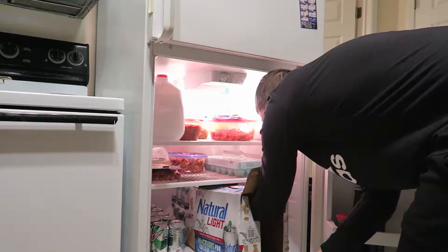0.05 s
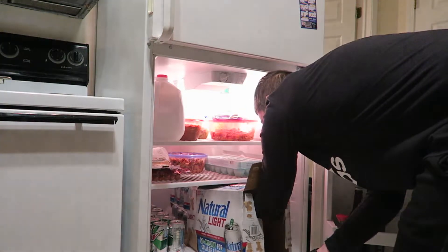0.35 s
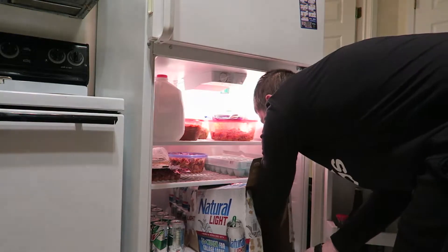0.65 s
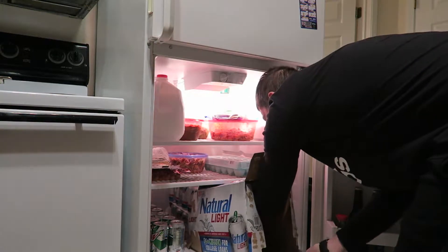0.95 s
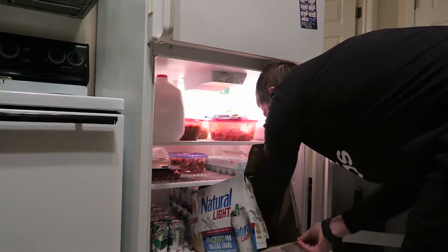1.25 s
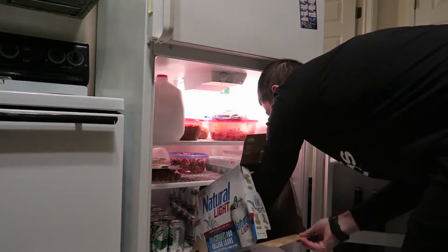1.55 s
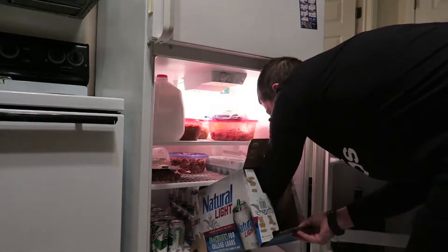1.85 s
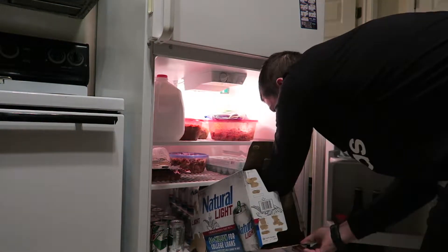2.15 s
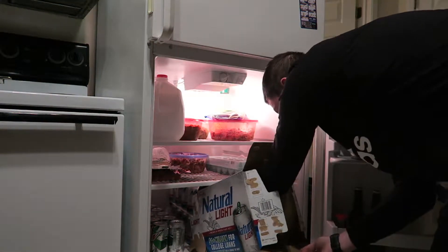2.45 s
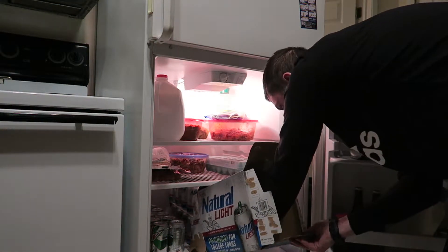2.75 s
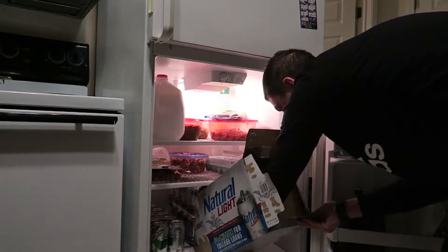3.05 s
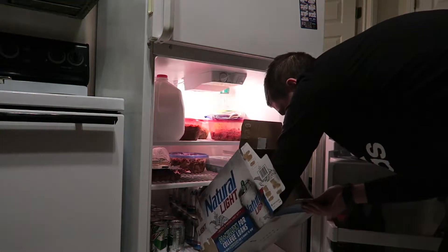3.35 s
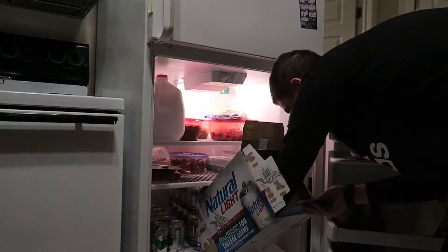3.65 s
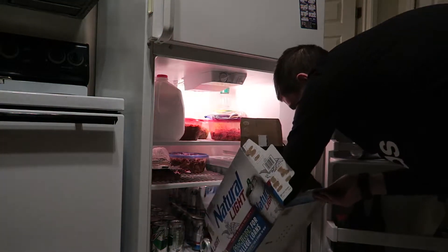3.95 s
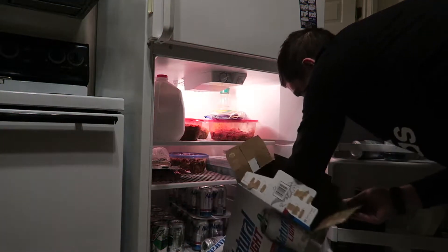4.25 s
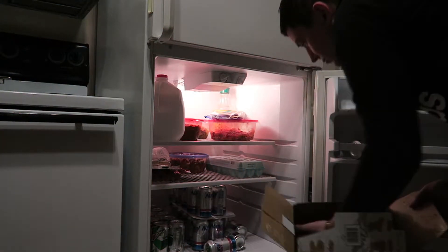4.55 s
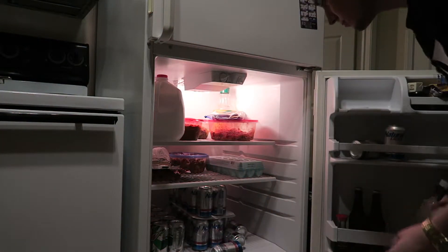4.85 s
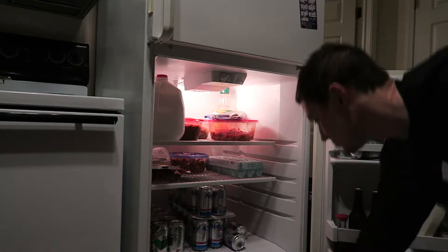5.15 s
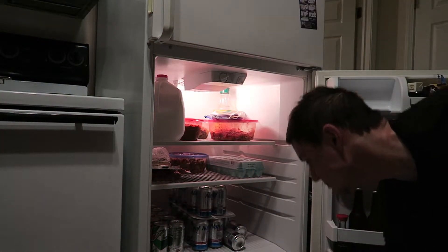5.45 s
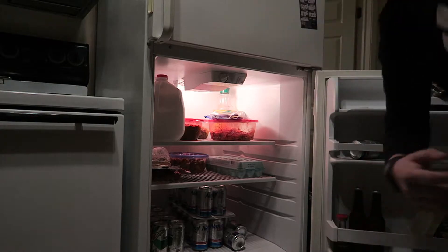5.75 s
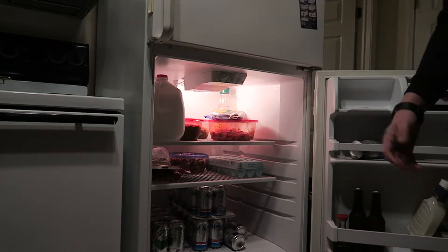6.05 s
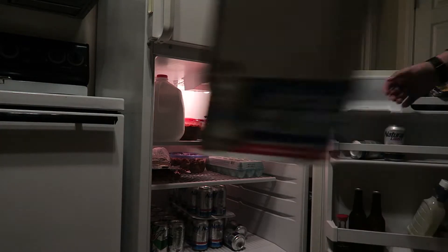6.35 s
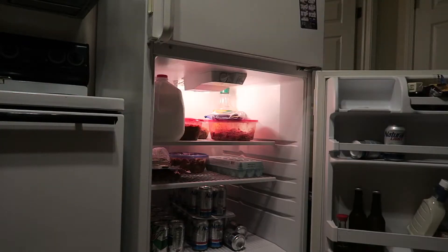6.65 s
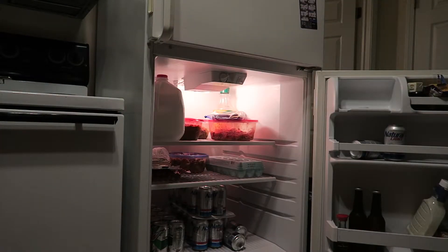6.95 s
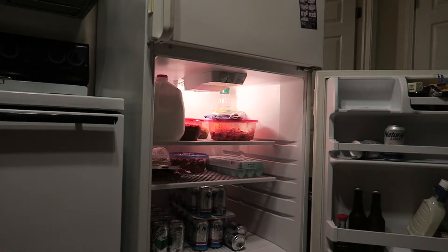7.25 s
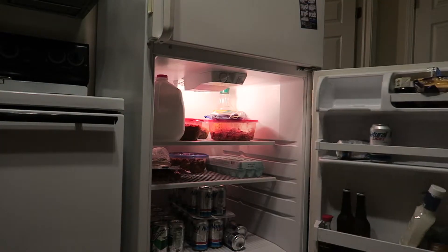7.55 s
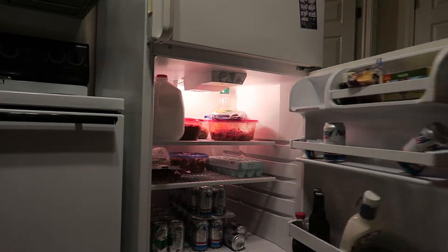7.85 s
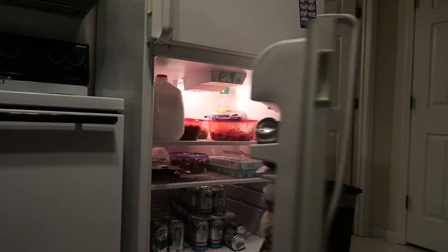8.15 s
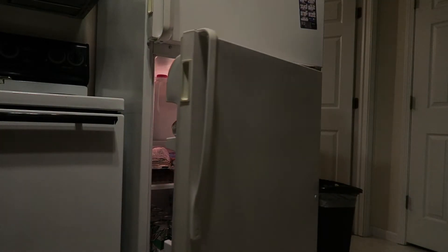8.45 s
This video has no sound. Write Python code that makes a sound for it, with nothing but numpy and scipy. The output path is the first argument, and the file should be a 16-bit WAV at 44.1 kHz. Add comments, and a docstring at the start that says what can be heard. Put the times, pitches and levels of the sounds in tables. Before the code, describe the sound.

A cardboard case of cans is worked against a refrigerator shelf, with dull thumps, rubbing, crinkles and brief squeaks. A cluster of loud knocks comes with a short clank of cans. The emptied case slaps, then clatters hollowly onto the floor. Finally the door swings with soft knocks and faintly clinking bottles and jars. It is heard from nearby in a small, slightly reverberant kitchen, over a low compressor rumble.

```python
"""A cardboard case of cans is worked against a refrigerator shelf in a small kitchen.
Impacts excite its panels and ring the cans and the shelf; stick-slip friction makes the card rub and
squeak, and buckling makes it crackle. The emptied case is pulled out, knocked and tossed on the floor.
Then the door is swung shut and the bottles and jars in its racks ring in their modes.
The room reverberates, and the compressor rumbles below."""
import sys
import numpy as np
from scipy import signal
from scipy.fft import rfft, irfft, next_fast_len
from scipy.io import wavfile
from scipy.ndimage import uniform_filter1d

SR = 44100
rng = np.random.default_rng(int(sys.argv[2]) if len(sys.argv) > 2 else 0)


def master(y):
    """Save y as 16-bit WAV."""
    cut = np.clip(np.atleast_2d(y).T, -1, 1)
    pcm = np.round(cut * 32767)  # scale
    wavfile.write(sys.argv[1], SR, pcm.astype(np.int16))


N = 375291
TIME = np.arange(N) / SR
BLOW_TIME = TIME[:SR // 3]
SHOVE_FADE_DB = 18   # fall over one release time
# resonances of the case on the shelf: (frequency [Hz], bandwidth [Hz], gain [dB])
CASE_MODES = [(97, 11, -2), (153.3, 7, 5.5), (218, 14, -2), (301, 7.3, -9), (324.6, 31, 5), (457, 210, 4.5),
              (880, 39, -1.5), (1720, 250, -14)]


def case_bumps():
    """Impact excitation: the case bumps, buckles and rebounds, driving its resonances."""
    # (time [s], level [dB], hardness [dB], panel frequency [Hz], rattle t60 [s])
    hits = [(0.002, -14, 1.5, 162.3, 0.12), (0.332, -11, 5, 425, 0.09), (0.361, -13, 0.5, 296, 0.023),
            (0.401, -18, 0, 188, 0.23), (0.457, -13, 2, 870, 0.062), (0.479, -11, -3, 477, 0.027),
            (0.520, -25.5, -10, 224, 0.17), (0.655, -26.5, -1, 334, 0.12), (1.853, -32.5, 4, 250, 0.39),
            (2.169, -30, 13, 580, 0.051), (2.750, -27.5, -3, 146, 0.26), (2.780, -31, 2.5, 480, 0.13),
            (3.043, -26, 5.5, 1040, 0.14), (3.099, -16, -0.5, 604, 0.15), (3.132, -23, -1, 213, 0.043),
            (3.281, -25.5, 5, 1090, 0.096), (3.298, -21, -2, 332, 0.28), (3.364, -30.5, 10, 131, 0.039),
            (3.650, -0.5, 2.5, 157, 0.13), (3.828, -18, -0.5, 443, 0.057), (3.877, -3.5, -0.5, 455, 0.16),
            (3.954, -4, 1, 352, 0.078), (4.022, -18, 0, 400, 0.16), (4.268, -28.5, -2, 410, 0.31),
            (4.526, -38, 4.5, 315, 0.079), (4.587, -35, -3.5, 334, 0.093), (4.702, -35.5, 2.5, 347, 0.08),
            (4.785, -53, 18, 690, 0.084), (4.915, -47.5, -10.5, 415, 0.26), (5.026, -30.5, 3.5, 485, 0.12),
            (5.083, -23.5, -5, 156, 0.39), (6.252, -34, 5.5, 394, 0.19), (6.293, -26, -3.5, 325, 0.075),
            (6.546, -7, 6.5, 434, 0.15), (6.598, -5.5, 8, 440, 0.077), (6.691, -16.5, 8.5, 327, 0.032),
            (6.768, -16.5, 8, 793, 0.17), (6.875, -19.5, 9, 524, 0.13)]
    # (ring [dB], thud [dB], body [dB], crack [dB], snap [dB])
    voice = [5, -4.5, -3, -14.5, -32]
    return blows(hits, CASE_MODES, voice, first=1.0, ring_cycles=20.3, lowpass_hz=(644, 2994),
                 t60_ratio=1.13, rise_s=0.0052, room_db=-1.5)


def case_knocks():
    """Impulsive excitation: on shelf and floor the force rises fast and the panel rings briefly."""
    # (time [s], level [dB], hardness [dB], panel frequency [Hz], rattle t60 [s])
    hits = [(0.850, -24, -3.5, 299, 0.074), (0.913, -32, 2, 314, 0.12), (1.345, -8.5, 2, 205, 0.12),
            (2.378, -27.5, -4.5, 375, 0.064), (3.099, -21.5, 0.5, 550, 0.06), (3.587, -7, 1.5, 96, 0.072),
            (3.878, -11.5, -1, 326, 0.074), (3.955, -9.5, 3.5, 170, 0.027), (6.492, -16, 3.5, 455, 0.016),
            (6.514, -7, 6, 386, 0.044), (6.584, -12.5, 4, 398, 0.023)]
    # (ring [dB], thud [dB], body [dB], crack [dB], snap [dB])
    voice = [16, -0.5, -1, -10.5, -30.5]
    return blows(hits, CASE_MODES, voice, first=0.84, ring_cycles=9.4, lowpass_hz=(517, 2200),
                 t60_ratio=1.7, rise_s=0.00089, room_db=1.5)


def blows(hits, modes, voice, first, ring_cycles, lowpass_hz, t60_ratio, rise_s, room_db):
    """Forced and free vibration: blows shake a body and its panel rings on; rows: direct, to room."""
    # thud, body, crack and snap registers: (lower edge [Hz], upper edge [Hz])
    registers = [(80, 250), (250, 1200), (1200, 4000), (4000, 14000)]
    # harder contact favours the treble: (ring, thud, body, crack, snap), each [dB per dB of hardness]
    hardness_slopes = [-0.78, -0.92, 0.17, 1.23, 1.03]
    times, level_db, hardness, panel_hz, t60s = np.array(hits).T
    gains_db = level_db + np.array(voice)[:, None] + np.outer(hardness_slopes, hardness)
    ring_gain, *register_gains = from_db(gains_db)
    rattles = 0
    for k, (edges, gain) in enumerate(zip(registers, register_gains)):
        register_t60s = t60s * t60_ratio ** (1 - k)   # the treble dies first
        force = contacts(register_t60s, np.full(len(times), rise_s), first)
        for hz in lowpass_hz:
            force = butter(force, hz, "low", order=1)
        band = butter(resonate(force, modes), edges, "band", order=3)
        rattles = rattles + gain[:, None] * burst_one(band)
    sharp_share, sag_s = 0.17, 0.0082   # a struck panel starts sharp and sags to its pitch
    cycles = panel_hz[:, None] * (BLOW_TIME + sharp_share * sag_s * (1 - np.exp(-BLOW_TIME / sag_s)))
    envelope = (1 - np.exp(-2 * cycles)) ** 2 * from_db(-60 * cycles / ring_cycles)
    panel = ring_gain[:, None] * envelope * np.sin(2 * np.pi * cycles)
    direct = place(times, rattles + panel)
    return np.array([direct, direct * from_db(room_db)])


def contacts(t60s, rises_s, first, clump_hz=120, clump_db=2.5):
    """Contact force, a row per blow: an impulse of size `first`, then a rattle dying in clumps."""
    shape = (len(t60s), len(BLOW_TIME))
    clumps = rms_one(butter(rng.standard_normal(shape), clump_hz, "low"))
    force = rng.standard_normal(shape) * from_db(2 * rng.standard_normal(shape) + clump_db * clumps)
    force *= from_db(-60 * BLOW_TIME / np.maximum(t60s, .005)[:, None])
    force *= 1 - np.exp(-BLOW_TIME / np.maximum(rises_s, .0001)[:, None])
    force[:, 0] += first
    return force


def emptied(case, from_s=4.45, level_db=-2, thin_hz=75):
    """Mass loading: without its cans the case is lighter and has a hollow, higher voice."""
    # (frequency [Hz], bandwidth [Hz], gain [dB])
    hollow_modes = [(420, 320, -5), (743, 146, 4.5), (1060, 240, 3.5), (1380, 510, -4.5)]
    empty = np.clip((TIME - from_s) * 20, 0, 1)
    hollow = resonate(butter(case * empty, thin_hz, "high"), hollow_modes)
    return case * (1 - empty) + from_db(level_db) * hollow


def thumps(sag_s=0.0091, attack_s=0.002, shuffle_db=-15, shuffle_hz=(180, 520)):
    """Damped oscillation: a soft landing booms, falling as the card relaxes; the load shuffles."""
    # (time [s], level [dB], first frequency [Hz], last frequency [Hz], t60 [s])
    landings = [(0.002, -12.5, 187, 158, 0.15), (0.520, -15, 227, 216, 0.44),
                (0.851, -2.5, 272, 140, 0.079), (0.915, -7, 174, 148, 0.14),
                (0.967, -10.5, 170, 147, 0.087), (1.020, -24, 160, 150, 0.09), (1.346, -1, 257, 207, 0.08),
                (1.624, -15, 150, 87, 0.18), (2.323, -24, 138, 110, 0.16), (2.363, -17.5, 262, 110.3, 0.2),
                (2.786, -20, 130, 92, 0.13), (3.096, -27, 162, 117, 0.15), (3.298, -13, 172, 147, 0.12),
                (3.353, -13, 130, 88, 0.07), (3.920, -3, 119, 94, 0.12), (3.986, -13, 175, 160, 0.28),
                (5.105, -15, 178, 158, 0.26), (5.479, -13.5, 337, 290, 0.17),
                (6.295, -17.5, 377, 316, 0.13)]
    out, t = np.zeros(N), BLOW_TIME
    for s, db, first_hz, last_hz, t60 in landings:
        hz = last_hz + (first_hz - last_hz) * np.exp(-t / sag_s)
        boom = np.sin(2 * np.pi * np.cumsum(hz) / SR)
        shuffle = rms_one(butter(rng.standard_normal(len(t)), shuffle_hz, "band", order=3))
        envelope = from_db(db - 60 * t / t60) * (1 - np.exp(-t / attack_s))
        add(out, s, envelope * (boom + from_db(shuffle_db) * shuffle))
    return out


def sliding(rub_db=-4, hiss_db=7, swell_share=0.91, scuff_hz=30, scuff_db=1.0):
    """Sliding friction: coarse slips drum on the case, fine ones hiss in its fibres; the grip varies."""
    # (peak time [s], release [s], rub level [dB], hiss level [dB])
    shoves = [(0.01, 0.067, -10, -39.5), (0.25, 0.26, -28, -52), (0.50, 0.26, -26, -60),
              (1.218, 0.091, -32.5, -50.5), (1.53, 0.38, -27, -52), (1.979, 0.076, -33.5, -57.5),
              (2.172, 0.072, -29, -45), (2.411, 0.15, -31.5, -49.5), (3.02, 0.54, -28, -51),
              (3.28, 0.28, -32, -48), (4.0, 0.18, -21.5, -46), (5.16, 0.39, -33, -66),
              (6.319, 0.23, -36, -53), (6.66, 0.19, -21.5, -35.5), (6.81, 0.13, -19.5, -47)]
    # light brushing on shelf and hands: (start [s], end [s], rub level [dB], hiss level [dB])
    brushes = [(0.0, 1.404, -38, -60), (4.56, 4.736, -52, -58)]
    # both: (frequency [Hz], spectral density [dB])
    rub_spectrum = [(40, -7), (90, 1.5), (160, 0), (280, -6.5), (500, -6.5), (800, -10.5), (1500, -16),
                    (3000, -35.5), (6000, -61)]
    hiss_spectrum = [(600, -1), (1500, 4), (2500, 4.5), (4000, -3), (6000, -9), (9000, -19.5), (12500, -20),
                     (15000, -42)]
    power = np.zeros((2, N))
    for s, release, *levels_db in shoves:
        away = np.maximum(TIME - s, (s - TIME) / swell_share) / release
        power += np.outer(from_db(levels_db), from_db(-SHOVE_FADE_DB * np.minimum(away, 10))) ** 2
    for start, end, *levels_db in brushes:
        power += np.outer(from_db(levels_db), (TIME >= start) & (TIME < end)) ** 2
    rub_gain, hiss_gain = uniform_filter1d(np.sqrt(power), SR // 50) * from_db([[rub_db], [hiss_db]])
    grip = from_db(scuff_db * rms_one(butter(rng.standard_normal(N), scuff_hz, "low")))
    hiss = colour(slips(per_s=4000, spread_db=3.0), hiss_spectrum)
    rub = colour(slips(per_s=900, spread_db=1.5), rub_spectrum)
    return grip * (rub_gain * rub + hiss_gain * hiss)


def slips(per_s, spread_db):
    """Stick-slip as a Poisson process: random clicks of uneven size."""
    sizes = from_db(spread_db * np.minimum(rng.exponential(1, N), 4)) * rng.choice([-1, 1], N)
    return sizes * (rng.random(N) < per_s / SR)


def squeaks(jitter=0.046, waver_hz=150, rough_db=2.0, overtone_db=-17, attack_s=0.0019):
    """Periodic stick-slip: card on the shelf gives a short, rough tone of unsteady pitch."""
    # (time [s], t60 [s], pitch [Hz], level [dB])
    tones = [(2.120, 0.27, 847, -31.5), (0.862, 0.32, 554, -27), (2.376, 0.22, 400.2, -19.5),
             (3.045, 0.24, 1054, -24.5), (3.099, 0.084, 524, -9), (3.28, .08, 1064, -22),
             (3.385, 0.17, 585, -22.5), (5.226, 0.071, 1028, -26)]
    out, t = np.zeros(N), BLOW_TIME
    for s, t60, hz, db in tones:
        waver, grip = rms_one(butter(rng.standard_normal((2, len(t))), waver_hz, "low"))
        phase = 2 * np.pi * np.cumsum(hz * (1 + jitter * waver)) / SR
        envelope = from_db(db + rough_db * grip - 60 * t / t60) * (1 - np.exp(-t / attack_s))
        add(out, s, envelope * (np.sin(phase) + from_db(overtone_db) * np.sin(2 * phase)))
    return out


def crinkles(band_ratio=1.436, swell_share=0.61):
    """Acoustic emission: bent card yields in swarms of tiny cracks around the pitch of the flap."""
    # (peak time [s], release [s], level [dB], centre frequency [Hz])
    bends = [(0.344, 0.044, -16.5, 1220), (0.427, 0.029, -24, 1370), (0.472, 0.027, -27, 1210),
             (0.862, 0.03, -35, 1700), (2.177, 0.041, -26.5, 1980), (3.372, 0.056, -42, 2660),
             (3.663, 0.083, -15.5, 1060), (3.888, .08, -32, 950), (3.960, 0.097, -17, 1000),
             (4.030, 0.073, -31, 1000), (4.695, 0.14, -44.5, 1290), (4.795, 0.097, -45.5, 1900),
             (4.988, 0.044, -43, 1930), (5.105, 0.12, -41, 1990)]
    cracks, out = slips(per_s=1800, spread_db=1.5), np.zeros(N)
    for s, release, db, hz in bends:
        near = np.abs(TIME - s) < 2 * release
        away = np.maximum(TIME[near] - s, (s - TIME[near]) / swell_share) / release
        swarm = rms_one(butter(cracks[near], [hz / band_ratio, hz * band_ratio], "band"))
        out[near] += from_db(db - SHOVE_FADE_DB * away) * swarm
    return out


def creases(low_hz=1100, dull_hz=2200, top_hz=9000, rise_share=0.061):
    """Buckling: folds in the card give way with short dry snaps."""
    # (time [s], level [dB], t60 [s])
    folds = [(0.317, -45, 0.086), (0.335, -32.5, 0.042), (0.348, -28.5, 0.035), (0.458, -43, 0.023),
             (0.478, -48, 0.037), (1.347, -45, 0.022), (1.847, -47, 0.037), (2.116, -45, 0.1),
             (2.173, -36.5, 0.034), (3.589, -28, 0.063), (4.984, -56, 0.071), (5.330, -51, 0.27),
             (5.471, -32.5, 0.052), (5.481, -34, 0.034), (5.779, -58, 0.059), (6.385, -47.5, 0.067),
             (6.515, -22.5, 0.019), (6.529, -30, 0.024), (6.545, -28, 0.025), (6.603, -33, 0.03),
             (6.698, -31, 0.036), (6.771, -35, 0.034), (6.875, -46.5, 0.027)]
    times, db, t60s = np.array(folds).T
    force = contacts(t60s, rise_share * t60s, first=5.9)
    snaps = burst_one(butter(butter(force, low_hz, "high"), dull_hz, "low", order=1))
    return butter(place(times, from_db(db)[:, None] * snaps), top_hz, "low")   # soft card has little top


def flap_smack(band_hz=(110, 2600), rise_s=0.0014):
    """Source and filter: loose flaps slap together in a dense burst that the empty case colours."""
    # (time [s], level [dB], t60 [s], raised to at least 0.005)
    touches = [(5.469, -19, -0.02), (5.479, -8, 0.0331), (5.502, -12.5, -0.07)]
    # (frequency [Hz], bandwidth [Hz], gain [dB])
    modes = [(176, 70, 17), (316, 96, 23), (495, 136, 31.8), (730, 120, 29), (920, 57, 20), (1290, 51, 8.2),
             (1420, 37, 5), (2930, 120, 2.9)]
    times, db, t60s = np.array(touches).T
    force = butter(contacts(t60s, np.full(len(times), rise_s), first=1.8), band_hz, "band")
    return place(times, from_db(db)[:, None] * burst_one(resonate(force, modes)))


def cans():
    """Heavily damped modes: full cans clank once when the case lands hard."""
    # (time [s], level [dB])
    touches = [(1.346, -24), (3.588, -15)]
    # (frequency [Hz], level [dB], t60 [s])
    modes = [(1475, 5, 0.042), (1520, 1, 0.031), (1640, 8, 0.042), (1730, -19, 0.018), (2140, -9, .04)]
    return ringing(touches, modes, count=1)


def shelf():
    """Lightly damped modes: the wire shelf rings on after a touch."""
    # (time [s], level [dB])
    touches = [(2.172, -67), (2.400, -38.5), (3.100, -52)]
    # (frequency [Hz], level [dB], t60 [s])
    modes = [(840, 2, 1.0), (868, -5, 0.6), (1085, -11, 0.5), (1265, -9, 0.9), (1318, -7, 0.7),
             (1438, -8, 0.6), (2135, -17, .45)]
    return ringing(touches, modes)


def door_blows():
    """Impact excitation: the door and its racks resonate as it swings shut."""
    # (time [s], level [dB], hardness [dB], panel frequency [Hz], rattle t60 [s])
    hits = [(7.302, -38.5, -1, 990, 0.044), (7.329, -37.5, -7.5, 346, 0.073),
            (7.488, -48.5, -0.5, 177, 0.087), (7.596, -52.5, -15, 830, 0.1), (7.617, -32, -0.5, 203, 0.15),
            (7.771, -32.5, 3.5, 600, 0.042), (7.789, -33.5, -2.5, 195, 0.42), (7.901, -39, -4, 483, 0.047),
            (8.000, -32.5, -1.5, 289, 0.21), (8.350, -26, -3, 84, 0.14), (8.411, -28.5, -3, 222, 0.077),
            (8.487, -27.5, -5.5, 97, 0.13)]
    # (frequency [Hz], bandwidth [Hz], gain [dB])
    modes = [(89.5, 32, 2), (111, 26, -20.5), (212, 17, 5), (364, 20, 4), (520, 92, 2.5), (716, 24, -5),
             (1770, 1160, 8)]
    # (ring [dB], thud [dB], body [dB], crack [dB], snap [dB])
    voice = [8.5, -8, -0.5, -5.5, -19]
    return blows(hits, modes, voice, first=3.0, ring_cycles=15.0, lowpass_hz=(660, 2510),
                 t60_ratio=1.2, rise_s=0.0036, room_db=4.5)


def bottles():
    """Repeated collisions: bottles chatter in the racks, exciting the modes of the glass."""
    # (time [s], level [dB])
    touches = [(7.619, -39.5), (7.680, -45), (7.772, -56), (7.797, -59), (7.861, -61), (8.361, -57)]
    # (frequency [Hz], level [dB], t60 [s])
    modes = [(1081, -3, 0.22), (1320, -25, 0.18), (1600, -10, 0.12), (1911, -1, 0.34), (2000, -7, 0.12),
             (2175, 0, 0.21), (2300, 8.5, 0.048), (2520, -8, 0.15), (2930, -11, 0.1), (3300, -22, 0.067),
             (4100, -5, 0.05), (4390, -14, 0.05)]
    return ringing(touches, modes, count=5, bounce_s=.011, bounce_db=-3.5, detune=.009)


def jars():
    """Free vibration: jostled jars ring lower than the bottles."""
    # (time [s], level [dB])
    touches = [(7.800, -52), (7.902, -66), (8.000, -37)]
    # (frequency [Hz], level [dB], t60 [s])
    modes = [(484, 4, 0.19), (615, 3, 0.31), (688.4, 2, 0.27), (1040, -12.5, 1), (1235, -1.5, 0.47),
             (1700, -15, 0.26), (2720, -12, 0.25), (2900, 2.5, 0.1), (3180, -5, 0.1), (4700, -16, 0.044)]
    return ringing(touches, modes, detune=0.011)


def ringing(touches, modes, count=3, bounce_s=.014, bounce_db=-4, detune=0):
    """Modal superposition: each bounce starts decaying sines; detune scatters their pitches."""
    out, t = np.zeros(N), TIME[:SR * 2 // 3]
    hz, db, t60 = np.transpose(modes)
    fades = from_db(db[:, None] - 60 * t / t60[:, None])
    for s, touch_db in touches:
        for k in range(count):
            strengths = from_db(touch_db + k * bounce_db + rng.normal(0, 2.0, len(hz)))
            pitches = hz * (1 + detune * rng.standard_normal(len(hz)))
            partials = fades * np.sin(2 * np.pi * pitches[:, None] * t)
            add(out, s + k * bounce_s * rng.uniform(0.61, 1.6), strengths @ partials)
    return out


def kitchen(sent, count=6, move_s=.45):
    """Time-varying reverberation: moving sources pass from one pattern of reflections to the next."""
    out = 0
    for k in range(count):
        away = np.abs((TIME / move_s - k + count / 2) % count - count / 2)
        crossfade = np.cos(np.pi / 2 * np.minimum(away, 1))
        out = out + signal.oaconvolve(sent * crossfade, room_response())[:N]
    return out


def room_response(build_s=0.00085):
    """Diffuse field: dense reflections build up quickly and decay exponentially, band by band."""
    # (frequency [Hz], t60 [s], raised to at least 0.1)
    decay_times = [(60, 0.14), (200, 0.43), (500, 0.5969), (1500, .5), (4000, 0.4), (8000, 0.38),
                   (15000, -0.06)]
    t, out = TIME[:SR * 3 // 4], 0
    edges = np.geomspace(45, 18000, 19)
    for low, high in zip(edges, edges[1:]):
        t60 = max(at_hz(decay_times, np.sqrt(low * high)), .1)
        envelope = from_db(-60 * t / t60) * (1 - np.exp(-(t / build_s) ** 2))
        band = butter(rng.standard_normal(len(t)) * envelope, [low, high], "band")
        out = out + band * np.sqrt((high - low) / (SR / 2) / np.sum(band ** 2))
    return out * np.sin(np.pi / 2 * np.minimum(10 * (t[-1] - t), 1)) ** 2   # the tail ends softly


def compressor():
    """Narrow-band noise: a deep rumble that sinks in the second half."""
    # (time [s], level [dB])
    levels = [(0, -49), (2, -44.5), (4.6, -48.5), (5.7, -54.5), (7.3, -55.5), (8.5, -53)]
    # (frequency [Hz], spectral density [dB])
    spectrum = [(20, 11), (38, 25), (51, 45.5), (66, 40.5), (120, -18.5)]
    return from_db(np.interp(TIME, *np.transpose(levels))) * colour(rng.standard_normal(N), spectrum)


def room_air(level_db=-51.5):
    """Broadband ambient noise: the faint hiss of the kitchen, partly coherent between channels."""
    # (frequency [Hz], spectral density [dB])
    spectrum = [(30, -37), (100, -0.5), (220, 0), (420, -1), (800, -9), (1600, -12.5), (2400, -14),
                (3400, -21.5), (4800, -22), (8000, -35), (12500, -36), (15000, -80)]
    # (frequency [Hz], side gain [dB])
    width = [(60, -28), (250, -6), (700, -8), (1500, -12), (2800, -13), (4500, -7.5), (7500, 0), (14000, 3)]
    mid, side = [from_db(level_db) * colour(white, spectrum) for white in rng.standard_normal((2, N))]
    return stereo(mid, side, width)


def stereo(mid, side, width):
    """Spatial coherence: two close microphones hear alike in the bass and differ in the treble."""
    side = equalise(side, width, next_fast_len(N + SR // 10))
    return np.array([mid + side, mid - side])


def fast_control(x, limit_db=-9, release_db_per_s=9, attack_s=0.028):
    """Limiting: loud knocks pull the gain down quickly; it creeps back up."""
    power = uniform_filter1d(x.mean(axis=0) ** 2, SR // 250)
    cut_db = held_excess(power, limit_db, release_db_per_s)
    return x * from_db(-smooth(cut_db, attack_s))


def slow_control(x, limit_db=-20, sense_s=0.14, bass_hz=72, upper_share=0.074):
    """Two-band compression: sustained loudness ducks the deep bass a lot and the rest a little."""
    power = smooth(x.mean(axis=0) ** 2, sense_s)
    cut_db = held_excess(power, limit_db, release_db_per_s=9.5, slope=2.06)
    bass = signal.sosfiltfilt(signal.butter(5, bass_hz, "low", fs=SR, output="sos"), x)
    return (x - bass) * from_db(-upper_share * cut_db) + bass * from_db(-cut_db)


def held_excess(power, limit_db, release_db_per_s, slope=1):
    """Peak detection: the decibels above a limit, times slope, released at a steady rate."""
    excess_db = np.maximum(10 * np.log10(power + 1e-12) - limit_db, 0)
    creep = release_db_per_s * TIME
    return np.maximum.accumulate(slope * excess_db + creep) - creep


def smooth(x, tau_s):
    """Exponential averaging."""
    pole = np.exp(-1 / (tau_s * SR))
    return signal.lfilter([1 - pole], [1, -pole], x)


def resonate(force, modes):
    """Resonance: a body passes the force and lifts the bands around its modes."""
    out = force.copy()
    for hz, width, db in modes:
        r = np.exp(-np.pi * width / SR)
        feedback = [1, -2 * r * np.cos(2 * np.pi * hz / SR), r * r]
        out += from_db(db) * signal.lfilter(np.array([1, 0, -1]) * (1 - r * r) / 2, feedback, force)
    return out


def butter(x, hz, kind, order=2):
    """Causal Butterworth filter."""
    return signal.sosfilt(signal.butter(order, hz, kind, fs=SR, output="sos"), x + 1e-18)


def equalise(x, curve, size):
    """Zero-phase filtering by a curve in decibels."""
    gain = from_db(at_hz(curve, np.fft.rfftfreq(size, 1 / SR)))
    return irfft(rfft(x, size) * gain, size)[:N]


def colour(x, spectrum):
    """Spectral shaping to rms 1."""
    return rms_one(equalise(x, spectrum, next_fast_len(N)))


def at_hz(points, hz):
    """Interpolation on a log-frequency axis."""
    points = np.array(points)
    return np.interp(np.log(np.maximum(hz, 1)), np.log(points[:, 0]), points[:, 1])


def from_db(db):
    """Decibels to amplitude ratio."""
    return 10 ** (np.asarray(db) / 20)


def rms_one(x):
    """Normalisation to rms 1."""
    return x / np.sqrt(np.mean(x ** 2) + 1e-20)


def burst_one(x):
    """Normalisation of each row to rms 1 in its loudest 10 ms."""
    return x / np.sqrt(uniform_filter1d(x ** 2, SR // 100, axis=-1).max(axis=-1, keepdims=True) + 1e-20)


def add(track, s, sound):
    """Superposition of a sound on a track at a time."""
    start = max(0, round(s * SR))
    track[start:start + len(sound)] += sound[:max(0, N - start)]


def place(times, sounds):
    """Superposition of sounds, each at its time, on a new track."""
    track = np.zeros(N)
    for s, sound in zip(times, sounds):
        add(track, s, sound)
    return track


def scene():
    """Direct and reverberant fields of case, shelf and door add to the background."""
    # (frequency [Hz], side gain [dB])
    width = [(25, -31), (60, -43), (130, -22.5), (250, -11.5), (700, -12.5), (1500, -14.5), (2800, -15),
             (4500, -5.5), (7500, 4), (14000, 6.5)]
    case = emptied(case_bumps() + case_knocks())
    door = door_blows()
    booms = thumps() * from_db([[0], [-10]])   # rows: direct, to room
    rings = bottles() + shelf() + jars()
    card = sliding() + crinkles() + squeaks() + flap_smack()
    snaps = creases() * from_db([[2], [-9]])   # snaps carry straight to the listener
    direct, sent = case + door + booms + snaps + (card + rings + cans()) * from_db([[-1], [-3]])
    lateral = from_db(-5.5) * signal.oaconvolve(sent, room_response())[:N]
    near_reflection = from_db(-6.5) * np.interp(TIME - .002, TIME, direct, left=0)
    return stereo(direct + kitchen(sent), lateral + near_reflection, width) + compressor() + room_air()


def record(dry, left_lead_db=.3, cutoff_hz=15800):
    """Dynamic compression, soft saturation of the hardest knocks and a steep low-pass."""
    x = slow_control(fast_control(dry)) * from_db(np.array([[1], [-1]]) * left_lead_db / 2)
    x = x / (1 + x ** 6) ** (1 / 6)
    return signal.sosfilt(signal.cheby2(14, 70, cutoff_hz, fs=SR, output="sos"), x)


dry = scene()
out = record(dry)
master(out)
```